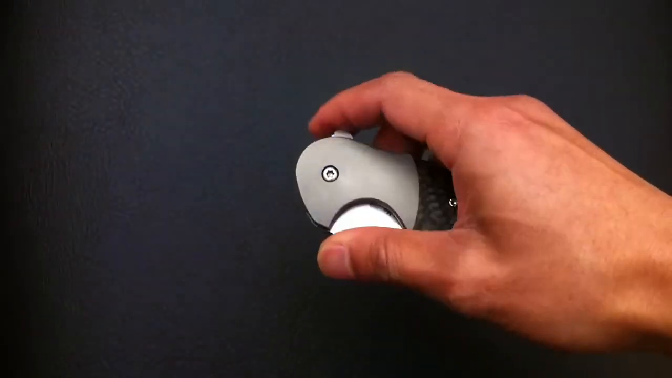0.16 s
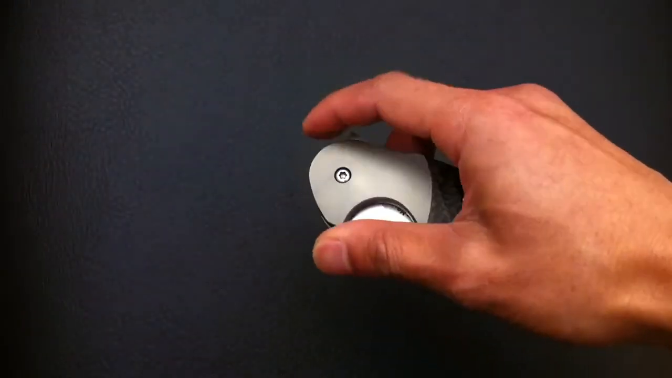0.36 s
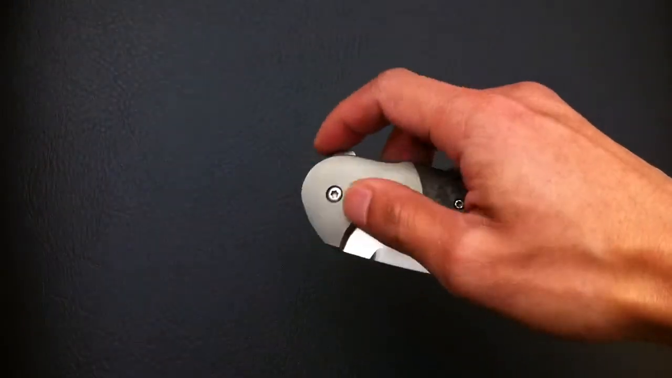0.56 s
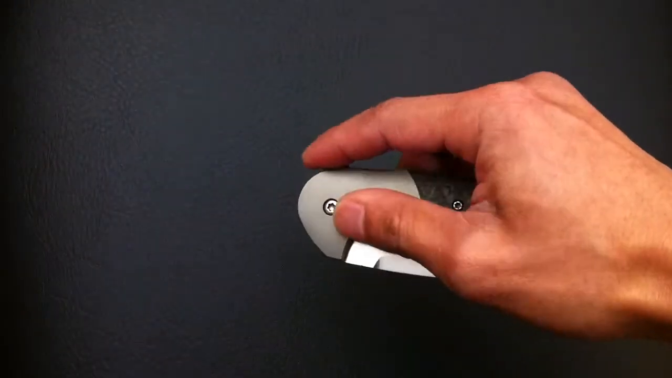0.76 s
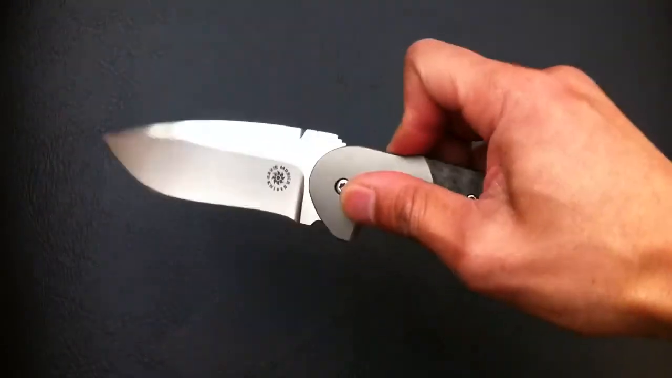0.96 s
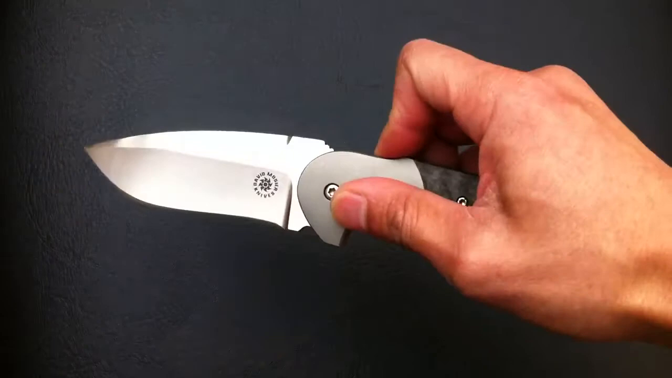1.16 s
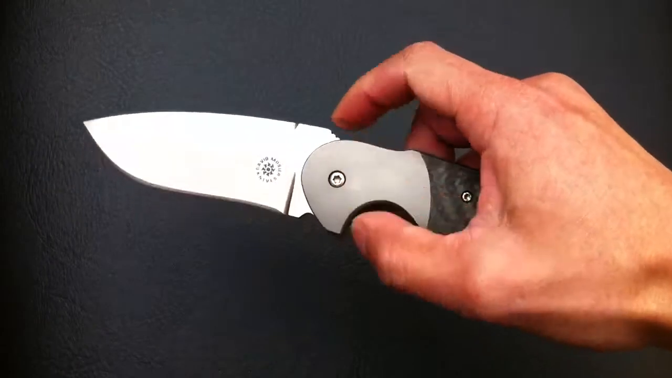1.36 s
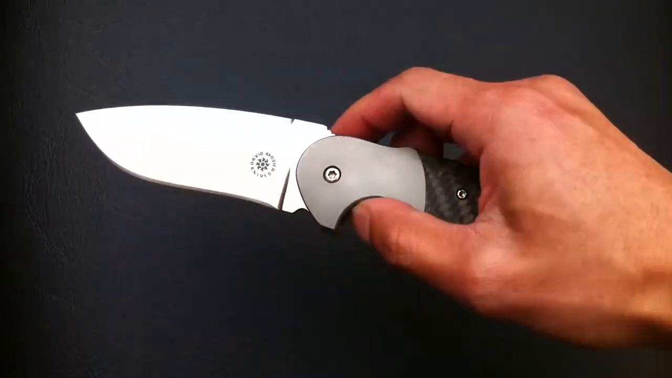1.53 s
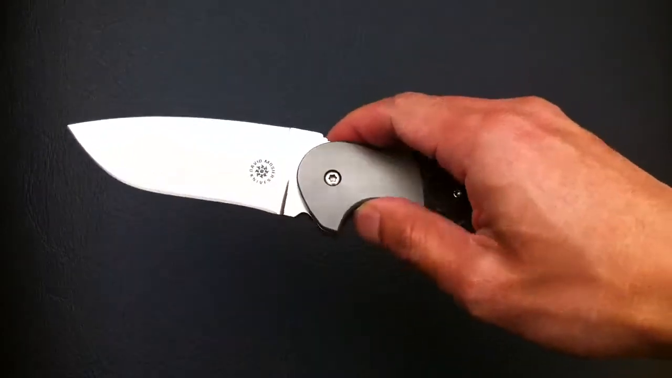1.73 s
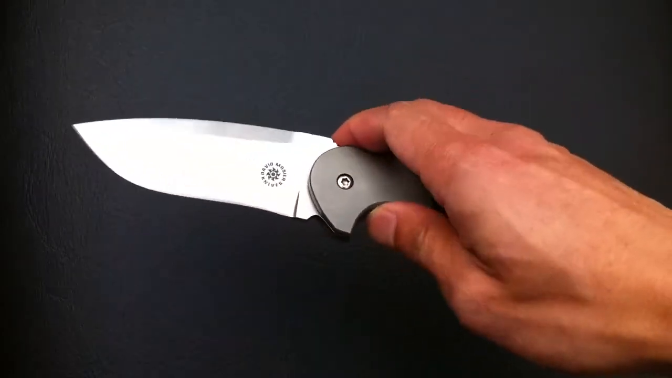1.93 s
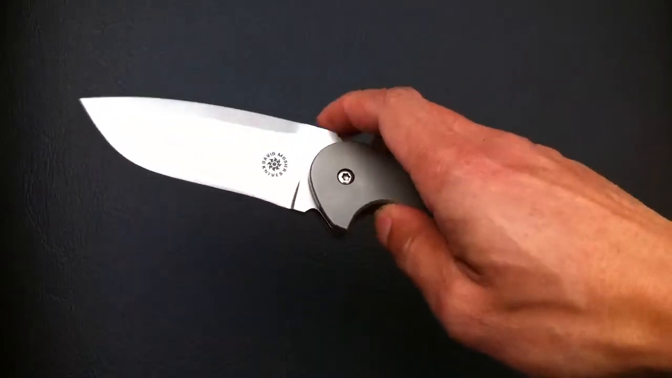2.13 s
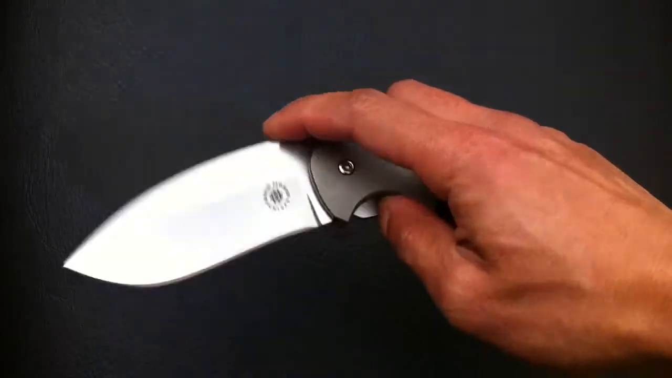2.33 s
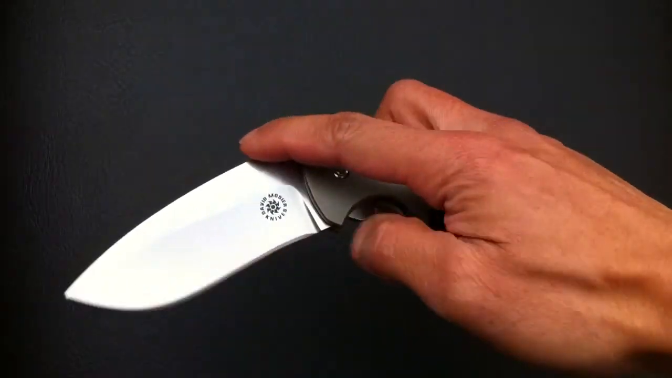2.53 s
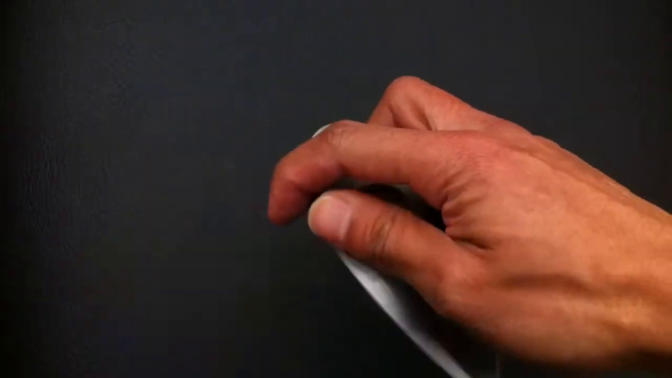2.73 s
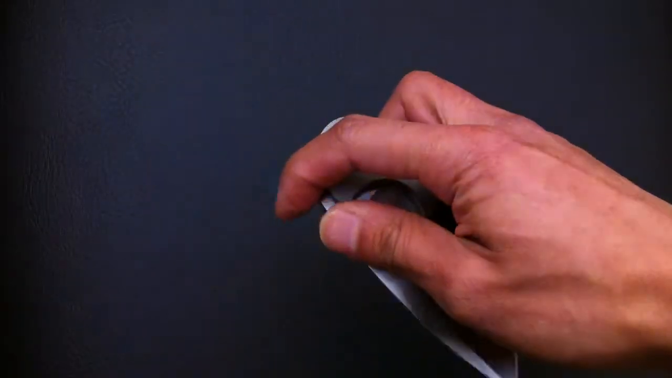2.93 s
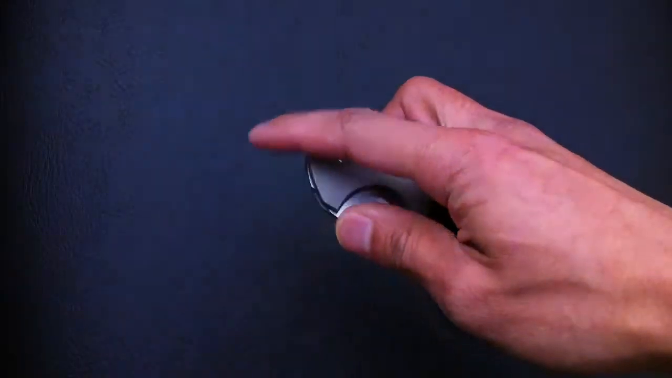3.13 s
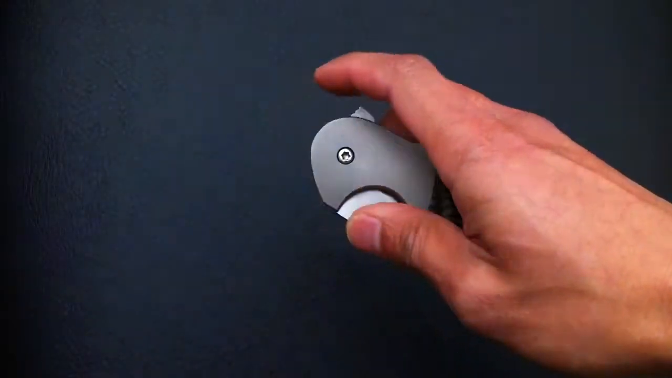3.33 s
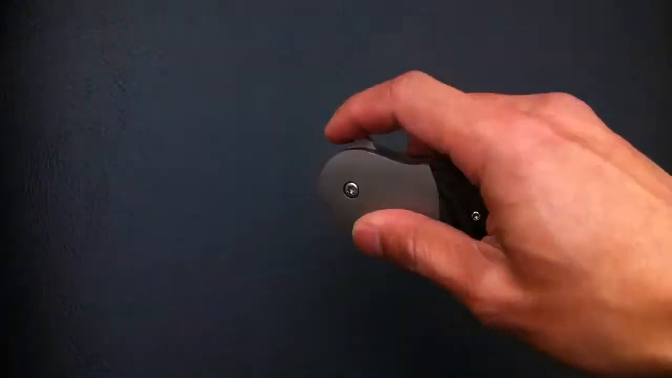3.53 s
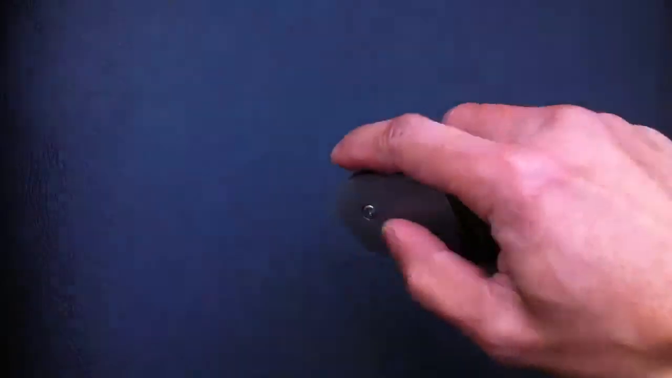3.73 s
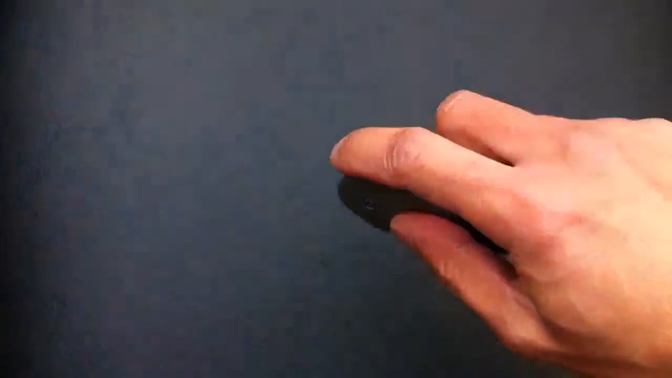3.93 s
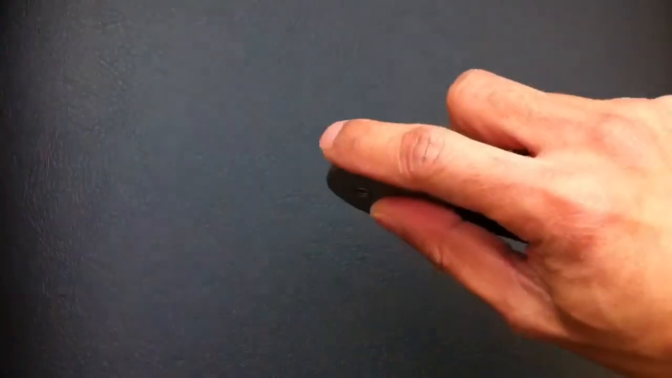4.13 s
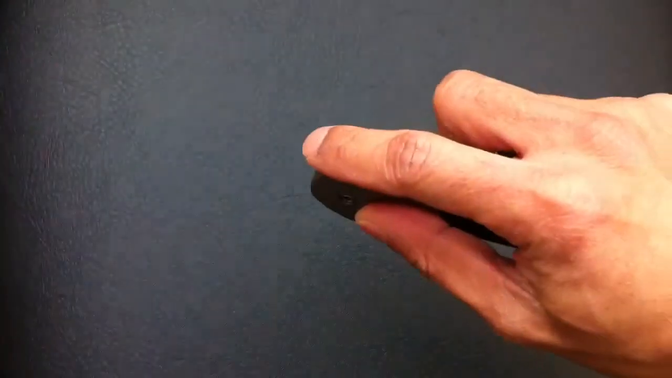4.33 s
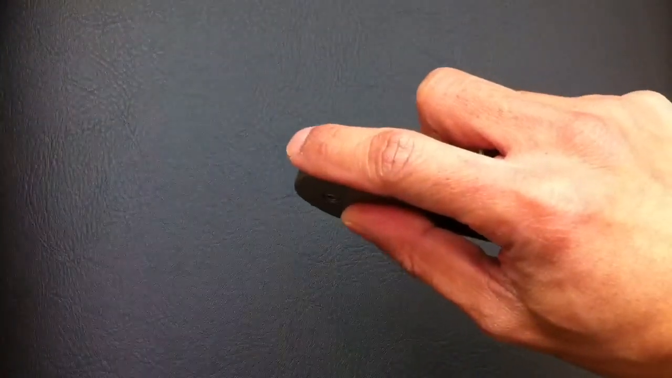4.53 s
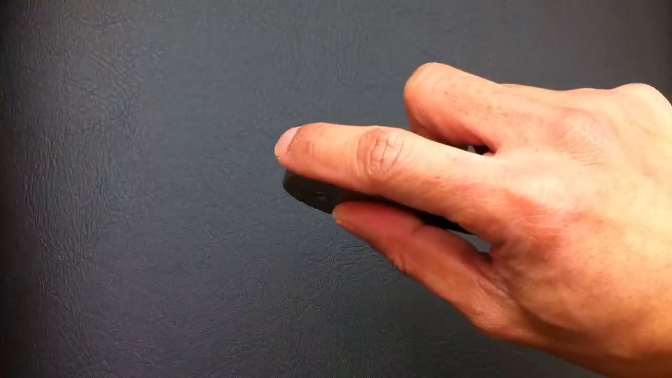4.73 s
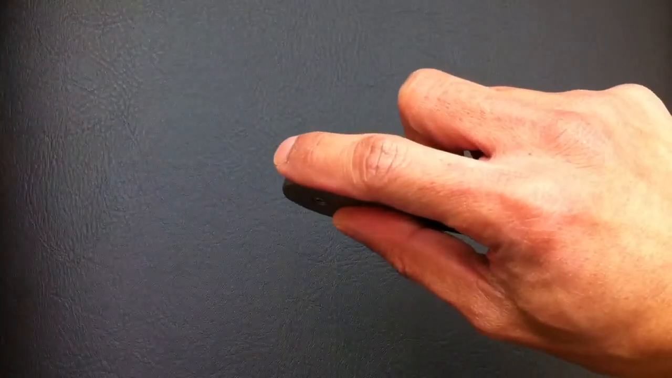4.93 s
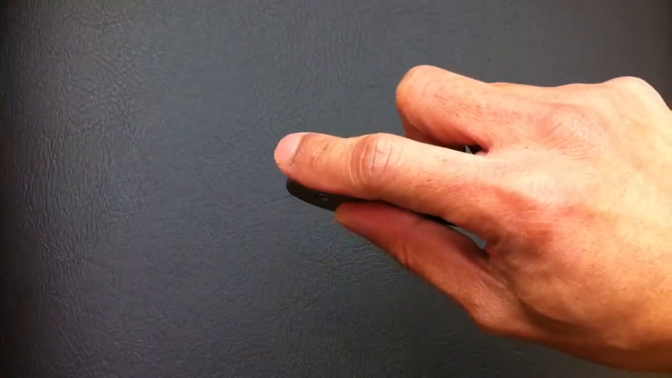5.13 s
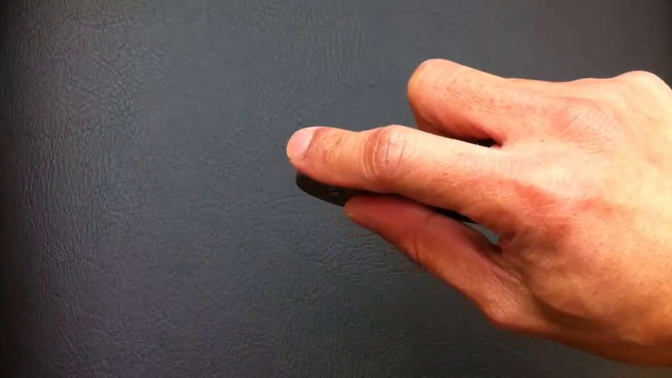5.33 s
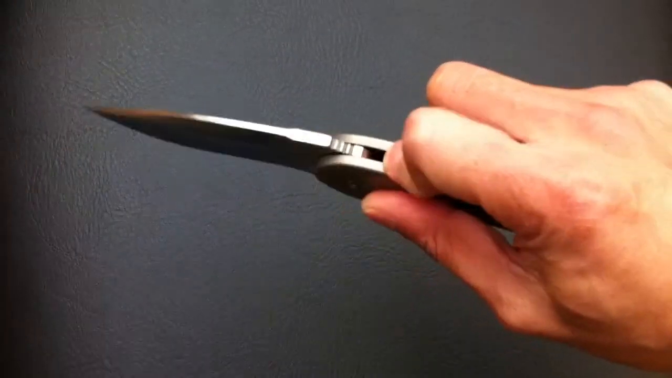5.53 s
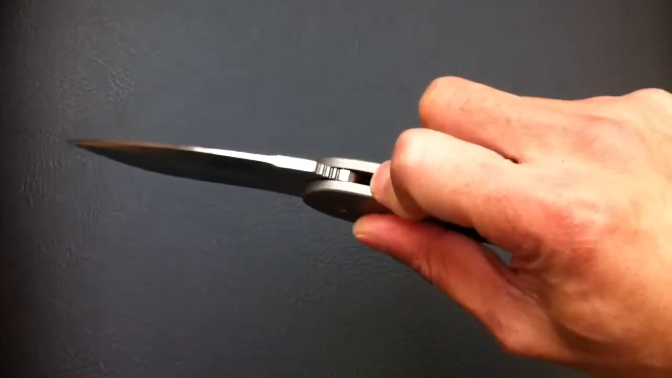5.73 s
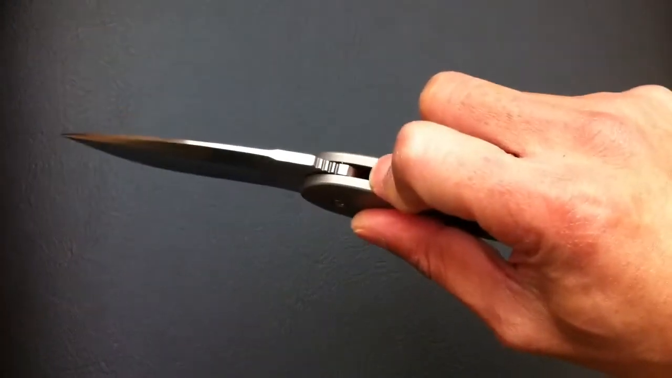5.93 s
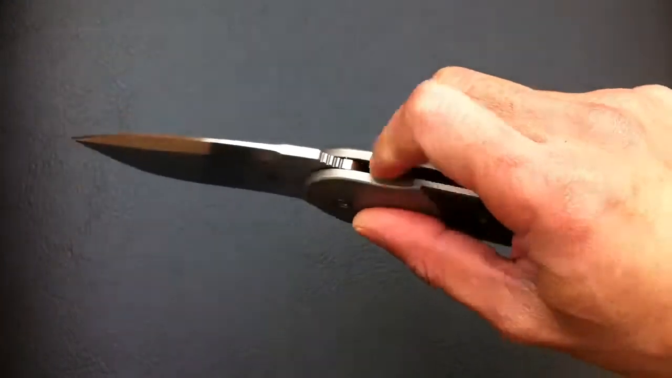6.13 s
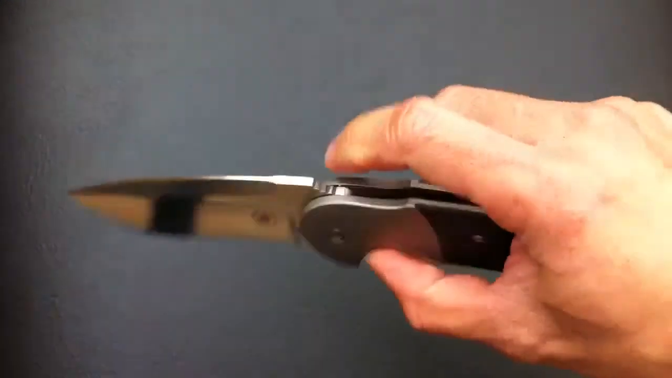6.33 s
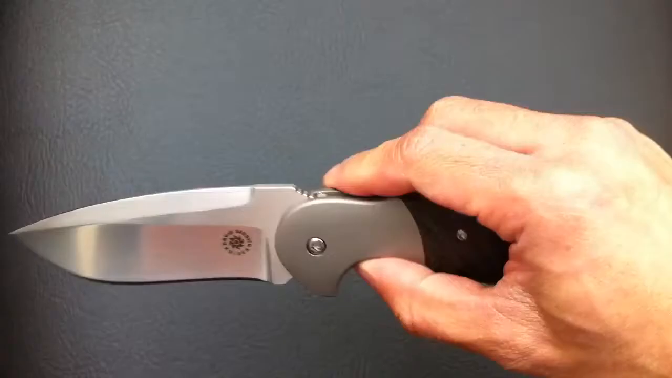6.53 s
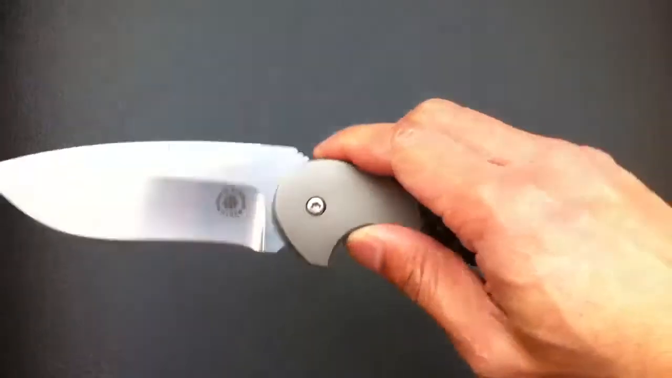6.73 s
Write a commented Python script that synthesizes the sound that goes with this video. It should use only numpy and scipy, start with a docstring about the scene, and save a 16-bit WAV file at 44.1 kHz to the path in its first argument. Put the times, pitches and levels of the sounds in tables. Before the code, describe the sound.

A folding knife is flicked open twice with sharp metallic snaps, with small clicks and soft handling between, over a faint fan.

```python
"""Folding knife, flicked open twice

Close up in a small room with a fan, a knife is flicked open, folded shut and flicked open again.
The blade whirrs on its pivot, the lock bar clicks and the blade slams on its stop; fingers bump and
rub the handle. Each slam drives a limiter down, so the room noise sinks and swells back."""
import sys
import numpy as np
from scipy import signal
from scipy.fft import rfft, irfft, next_fast_len
from scipy.io import wavfile
from scipy.ndimage import uniform_filter1d

SR = 44100
rng = np.random.default_rng(int(sys.argv[2]) if len(sys.argv) > 2 else 0)


def int16_out(signal):
    """Quantize to a 16-bit WAV file."""
    q = np.round(np.clip(np.atleast_2d(signal).T, -1, 1) * 32767)
    wavfile.write(sys.argv[1], SR, q.astype(np.int16))


N = 299439
TIME = np.arange(N) / SR

# The bright crack of a contact. Each row: frequency in Hz, level in dB.
CRACK_COLOUR = [(1200, -15.5), (2200, -2), (3700, -5), (5000, 0), (6500, 3.5), (10000, -2), (13500, -8.5),
                (16000, -21)]


def snaps(crack_db, crack_s, blade_db, detune, ring_share=1, pitch_ratio=1, hand_cover_db=0):
    """Slams and clicks: heavy blows crack harder; the blade sings on, less when covered or shut."""
    # The free blade's faint ring. Each row: pitch in Hz, level in dB, t60 in seconds.
    blade_modes = [(5040, -44, .18), (6140, -39, .17), (5949, -38.5, 0.25), (5740, -42, .18),
                   (6590, -49.5, .17)]
    hardening, covered_blade_db = 0.12, -10
    out, t = np.zeros(N), np.arange(SR // 3) / SR
    for s, db, modes, ratio, colour, cover in slams() + bar_clicks():
        tuned = retuned(modes, ratio * pitch_ratio, ring_share)
        hit = strike(tuned, colour, crack_db + hardening * db, crack_s, detune)
        add(out, s, from_db(db + cover * hand_cover_db) * hit)
        blade = ring(blade_modes, t, spread_db=3, detune=0.001008)
        add(out, s, from_db(db + blade_db + cover * covered_blade_db) * blade)
    return out


def slams(flats_mid_db=-1, flats_cover=0.75):
    """List the blade's hits and rebounds on its stop; the grip decides which modes ring."""
    # Each row: start in seconds, level in dB, grip from 0 (by the flats) to 1 (by the edges),
    # midrange boost in dB, pitch ratio.
    blows = [(1.0719, 4.5, 0.17, 0, 1.06), (1.0732, 5.5, .05, -4.5, .995), (1.0759, -7.5, .05, -4, 1.03),
             (5.6592, 2, 0.88, 0.5, 1.005), (5.6604, 2, 0.81, 2.5, .995), (5.6618, -2, 0.66, 1.5, 1.03)]
    # Blade and handle, damped by the hand. Each row: pitch in Hz, level in dB held by the flats,
    # level in dB held by the edges, t60 in seconds.
    knife_modes = [(1440, -27, -23.5, 0.0089), (1957, -17, -11, .006), (2480, -16, -9.5, 0.0098),
                   (3230, -21.5, -5, 0.012), (4690, -23.5, -10.5, 0.0088), (5220, -17, -2, .011),
                   (6200, 0, -0.5, 0.012), (6453, 0, -4, 0.011), (7062, -6, -2, 0.01),
                   (7740, -11, -11.5, .009), (9100, -9.5, -13, .006), (10950, -18, -8.5, 0.0069),
                   (12300, -12, -12, 0.0036), (13886, -25.5, -13, 0.0041)]
    hits = []
    for s, db, edges, mid_db, ratio in blows:
        modes = [(hz, np.interp(edges, [0, 1], [flats_db, edges_db]), t60)
                 for hz, flats_db, edges_db, t60 in knife_modes]
        colour = boosted(CRACK_COLOUR, mid_db + flats_mid_db * (1 - edges))
        cover = flats_cover * (1 - edges)
        hits.append((s, db, boosted(modes, mid_db), ratio, colour, cover))
    return hits


def bar_clicks():
    """List the lock bar's clicks and bounces as the blade leaves the detent, locks or is pulled shut."""
    # Each row: start in seconds, level in dB, midrange boost in dB, boost of the bar's low ring in dB,
    # pitch ratio, whether the blade is shut.
    clicks = [(0.051, -32.5, 9, 3, 1.03, True), (0.0548, -21, 2, 2, 0.99, True),
              (1.0029, -42, 0, 13, 1.1, True), (1.0053, -36, -3, 16.5, 1.04, True),
              (1.0639, -13.5, -12.5, 3, 1.001, False), (1.0655, -14, -10.5, -2.5, 1.001, False),
              (3.3153, -35, -1, 0, 1.2, True), (3.3182, -22.5, 1.5, -0.5, 1.022, True),
              (5.5974, -38.5, 2, 14, 1.05, True), (5.6516, -19, -10, 6, 1.04, False),
              (5.6536, -18, -10, 14.5, 0.94, False)]
    # The lock bar with its detent ball. Each row: pitch in Hz, level in dB, t60 in seconds.
    bar_modes = [(2568, -14, .005), (3230, -16.5, .007), (5025, -9.5, 0.011), (6050, -2, 0.006),
                 (6737, -0.5, .01), (7450, -5.5, 0.0058), (9100, -10, 0.0045), (11400, -19, 0.0042),
                 (13400, -24.5, .005)]
    hits = []
    for s, db, mid_db, low_ring_db, ratio, shut in clicks:
        modes = boosted(boosted(bar_modes, mid_db), low_ring_db, centre_hz=5200, octaves=0.13)
        hits.append((s, db, modes, ratio, boosted(CRACK_COLOUR, mid_db), shut))
    return hits


def ticks():
    """Tiny, dry stick-slip ticks as a finger loads the flipper or catches on the handle."""
    # Each row: start in seconds, level in dB, midrange boost in dB, pitch ratio.
    slips = [(0.376, -45.5, -13, 0.83), (2.4903, -51, 0, .82), (3.985, -50, -3, 1.1),
             (4.4067, -36, 1, 1.03), (4.5252, -47.5, -3, 1.04), (4.863, -42, 17, 0.9),
             (4.8679, -32, 0, 1.03), (4.8959, -34.5, -5, 0.99), (4.9332, -34, -4, 1), (4.9625, -35.5, 0, 1),
             (4.9966, -39, -4, 1.015), (5.0241, -43, -5, .99)]
    # The knife's stiff, high modes. Each row: pitch in Hz, level in dB, t60 in seconds.
    tick_modes = [(3360, -5.5, 0.0047), (5500, -5, .005), (6820, 6.5, 0.0036), (7470, 2.5, 0.013),
                  (7960, -0.5, 0.0041), (9380, -4.5, 0.013), (10800, -5.5, 0.0076), (13700, -16, .003)]
    out = np.zeros(N)
    for s, db, mid_db, ratio in slips:
        modes = retuned(boosted(tick_modes, mid_db), ratio)
        tick = strike(modes, boosted(CRACK_COLOUR, mid_db), crack_db=-7.5, crack_s=0.0009, detune=0.018)
        add(out, s, from_db(db) * tick)
    return out


def slides(grain_db=2, resonance_db=-3, width_hz=1100):
    """Grainy friction swells and fades with each stroke, ringing the rubbed part and the handle."""
    # Skin sliding on metal. Each row: midpoint in seconds, half-length in seconds, level in dB,
    # resonance in Hz, handle ring in dB.
    skin_strokes = [(0.152, 0.086, -63, 10000, -28), (0.382, 0.031, -56.5, 5550, 3),
                    (0.411, 0.081, -62.5, 5700, 0.5), (0.802, 0.24, -70, 6300, -12),
                    (1.421, 0.143, -66.5, 6400, -10), (1.631, 0.15, -67.5, 6400, -8),
                    (1.923, 0.33, -71.5, 6160, -9), (2.474, 0.025, -59, 5140, -15),
                    (2.604, .053, -63, 5970, -13), (2.831, .14, -71, 7000, -13.5),
                    (3.563, 0.1, -59.5, 5830, -1), (3.672, 0.13, -61, 5770, -7.5),
                    (3.878, .1, -66, 5860, -5.5), (3.984, 0.047, -63, 8760, -15),
                    (4.094, 0.079, -64.5, 6800, -12.5), (4.44, 0.065, -61.5, 8030, -18.5),
                    (5.398, 0.14, -64.5, 4670, -11), (6.435, 0.064, -63, 6460, -11),
                    (6.672, 0.25, -67.5, 6600, -10)]
    # The pivot whirring as the blade swings open. Rows as for the skin.
    pivot_swings = [(1.021, .038, -53.5, 6248, -11.5), (5.615, .038, -53, 6400, -14)]
    # The hiss of friction. Each row: frequency in Hz, level in dB.
    rub_colour = [(1500, -18), (2600, -1.5), (3700, -8.5), (4800, -5), (6000, 0), (7400, -2.5), (8400, -4),
                  (11000, -4.5), (13000, -10), (16000, -16.5)]
    # The rubbed handle's resonances. Each row: pitch in Hz, width in Hz, level in dB.
    handle_rings = [(2620, 110, -4), (5600, 200, 1.5), (6100, 220, -3), (8250, 400, -8.5),
                    (10953, 400, -5.5)]
    out = np.zeros(N)
    for s, half_s, db, hz, ring_db in skin_strokes + pivot_swings:
        size = int(2 * half_s * SR)
        stroke = np.hanning(size) ** 2
        surface = rms_one(uniform_filter1d(rng.standard_normal(size), size=90))
        rub = rms_one(from_db(grain_db * surface) * scratch(size) * noise(rub_colour, size))
        part = from_db(resonance_db) * resonate(rub, hz, width_hz)
        rings = sum(from_db(level) * resonate(rub, pitch, width) for pitch, width, level in handle_rings)
        handle = from_db(ring_db) * rms_one(rings)
        add(out, s - half_s, from_db(db) * stroke * rms_one(rub + part + handle))
    return out


def scratch(size, catches_per_s=260, catch_s=0.0003, catch_db=5):
    """Gain of a rub: the skin catches at random, and each slip is a brief spurt."""
    catches = (rng.random(size) < catches_per_s / SR) * rng.random(size)
    return 1 + from_db(catch_db) * signal.lfilter([1], [1, -np.exp(-1 / (catch_s * SR))], catches)


def thuds(swell_s=0.00456, reference_db=-34.5, shortening=0.354):
    """The handle meets flesh in thuds of a few cycles; a harder bump is shorter."""
    # Soft bumps on the fingers. Each row: crest in seconds, level in dB, pitch in Hz.
    bumps = [(0.015, -43.5, 223), (.667, -35.5, 151), (0.697, -32, 256), (1.357, -37, 158),
             (1.785, -36.5, 166.2), (3.332, -32, 274), (3.355, -22.5, 191), (3.357, -36, 367),
             (3.504, -26.5, 168), (3.507, -41.5, 337), (3.524, -34.5, 230), (3.581, -35, 182),
             (3.674, -40, 128), (3.751, -37.5, 192), (3.831, -34, 145)]
    # Hard knocks in the hand. Each row: crest in seconds, level in dB, pitch in Hz, swell in seconds.
    knocks = [(1.0733, -19, 970, 0.00076), (1.0734, -33.5, 350.7, .0016), (4.863, -45, 1600, .0005),
              (5.599, -40.5, 2150, 0.00051), (5.6602, -24, 1660, .0005), (5.6607, -32, 700, 0.00083)]
    soft = [(s, db, hz, swell_s * from_db(shortening * (reference_db - db))) for s, db, hz in bumps]
    out, t = np.zeros(N), np.arange(SR // 6) / SR
    for s, db, hz, swell in soft + knocks:
        push = (t / (2 * swell)) ** 4 * np.exp(4 - 2 * t / swell)   # crests at twice the swell time
        add(out, s - 2 * swell, from_db(db) * push * np.sin(2 * np.pi * (hz * t + rng.random())))
    return out


def grip(rise_db_per_s=330, rest_db=-69):
    """The hand rumbles: each shift of grip rises fast and settles back to the resting hold."""
    # Each row: crest in seconds, level in dB, settling rate in dB per second.
    regrips = [(.68, -41, 100), (1.3, -48, 89.5), (3.335, -41.5, 128.5), (3.51, -48.5, 17),
               (3.799, -48, 40)]
    # The hand's low rumble. Each row: frequency in Hz, level in dB.
    grip_colour = [(30, -20.5), (60, -13), (100, 1.5), (170, 4.5), (260, -5.5), (400, -7), (700, -32.5),
                   (1500, -62)]
    shifts_db = [db - np.maximum(rise_db_per_s * (s - TIME), settling * (TIME - s))
                 for s, db, settling in regrips]
    return from_db(np.maximum(np.max(shifts_db, axis=0), rest_db)) * noise(grip_colour)


def palm(spread_octaves=0.21, half_s=0.05):
    """The palm drags dully over the handle, twice."""
    out = np.zeros(N)
    stroke = np.hanning(int(2 * half_s * SR)) ** 2
    for s, db, hz in [(1.92, -48, 566), (1.99, -52, 440)]:
        rub = noise_band(hz / 2 ** spread_octaves, hz * 2 ** spread_octaves, len(stroke))
        add(out, s - half_s, from_db(db) * stroke * rub)
    return out


def fan(air_db=-52.5):
    """A bed of dull, steady air noise with two wavering drones."""
    # Moving air in the room. Each row: frequency in Hz, level in dB.
    air_colour = [(25, -14.5), (55, -20), (85, -16.5), (125, -0.5), (220, 2), (400, -2.5), (650, -5.5),
                  (920, -2.5), (1400, -9.5), (2000, -18.5), (3000, -27.5), (6500, -28.5), (9500, -32.5),
                  (15500, -35)]
    # Each row: pitch in Hz, width in Hz, level in dB.
    drones = [(144.8, 7.6, -64), (270.4, 16, -59.5)]
    out = from_db(air_db) * noise(air_colour)
    for hz, width, db in drones:
        out += from_db(db) * noise_band(hz - width / 2, hz + width / 2)
    return out


def room(x, first_echo_s=0.0026, early_t60_s=0.06, early_db=-13, tail_t60_s=0.22, tail_db=-17):
    """Quick reflections from the table and the hand, then the walls' dense, duller tail."""
    # The tone of the reflections. Each row: frequency in Hz, level in dB.
    room_colour = [(100, -13.5), (800, -4), (2400, -2.5), (3300, 0.5), (4200, 0), (5900, 3), (6800, -3.5),
                   (7800, -2), (10000, 2), (16000, -8.5)]
    t = np.arange(SR // 2) / SR
    early, tail = (noise(room_colour, len(t)) * from_db(-60 * t / t60) * (t > first_echo_s)
                   for t60 in (early_t60_s, tail_t60_s))
    tail = filtered(tail, "low", hz=11000)
    response = from_db(early_db) * early / np.linalg.norm(early)
    response += from_db(tail_db) * tail / np.linalg.norm(tail)
    return signal.fftconvolve(x, response)[:N]


def strike(modes, crack_colour, crack_db, crack_s, detune):
    """One contact with peak 1: modes ring under a brief crack; so small a body radiates no bass."""
    t = np.arange(SR // 16) / SR
    body = ring(modes, t, spread_db=-0.5, detune=detune)
    crack = from_db(crack_db) * noise(crack_colour, len(t)) * np.exp(-t / crack_s)
    hit = filtered(body + crack, "high", hz=600)
    return hit / np.abs(hit).max()


def ring(modes, t, spread_db, detune):
    """Modes decay from one blow; the spot struck and the grip vary their strength and pitch a little."""
    hz, db, t60 = np.transpose(modes)[:, :, None]
    strength, shift = rng.standard_normal((2, len(modes), 1))
    sign = (-1) ** np.arange(len(modes))[:, None]
    decay = from_db(db + spread_db * strength - 60 * t / t60)
    return np.sum(sign * decay * np.sin(2 * np.pi * hz * (1 + detune * shift) * t), axis=0)


def boosted(rows, boost_db, centre_hz=2900, octaves=0.27):
    """A bell EQ on rows that begin with Hz and dB, by default at the handle's midrange."""
    return [(hz, db + boost_db * np.exp(-(np.log2(hz / centre_hz) / octaves) ** 2 / 2), *rest)
            for hz, db, *rest in rows]


def retuned(modes, ratio, ring_share=1):
    """Modes shifted in pitch by the spot struck, ringing for a share of their usual time."""
    return [(hz * ratio, db, t60 * ring_share) for hz, db, t60 in modes]


def resonate(x, hz, width_hz):
    """One resonance, at unit power."""
    return rms_one(signal.lfilter(*signal.iirpeak(hz, hz / width_hz, fs=SR), x))


def noise(colour, size=N):
    """Unit-power noise shaped by points of Hz and dB."""
    padded = next_fast_len(size)
    hz, db = np.transpose(colour)
    gain = from_db(np.interp(np.log(np.fft.rfftfreq(padded, 1 / SR) + 1), np.log(hz), db))
    return rms_one(irfft(rfft(rng.standard_normal(padded)) * gain, padded)[:size])


def noise_band(low_hz, high_hz, size=N):
    """A band of noise at unit power."""
    return rms_one(filtered(rng.standard_normal(size), "band", [low_hz, high_hz]))


def filtered(x, kind, hz):
    """A gentle low-, high- or band-pass."""
    return signal.sosfilt(signal.butter(2, hz, kind, fs=SR, output="sos"), x)


def from_db(db):
    """Decibels to gain."""
    return 10 ** (np.asarray(db) / 20)


def rms_one(x):
    """Scale to unit power."""
    return x / np.sqrt(np.mean(x ** 2) + 1e-20)


def add(track, s, sound):
    """Mix a sound into the track from time s."""
    start = max(0, round(s * SR))
    track[start:start + len(sound)] += sound[:max(0, N - start)]


def scene(sides=3):
    """The close knife, its reflections, the hand and the fan, in mono."""
    friction = ticks() + slides()
    direct = snaps(crack_db=-10.5, crack_s=0.0011, blade_db=-19.5, detune=0.0034) + friction
    reflections = np.zeros(N)
    for _ in range(sides):   # the walls hear the knife from all sides, so its peaks and notches even out
        off_axis = snaps(crack_db=-0.5, crack_s=0.00049, blade_db=-17.5, detune=0.025,
                         ring_share=0.55, pitch_ratio=0.97, hand_cover_db=-6)
        reflections += room(off_axis + from_db(-10) * friction) / np.sqrt(sides)
    return (direct + reflections + thuds() + grip() + palm() + fan())[None]


def record(dry, threshold_db=-10.5, release_s=0.85, clip_level=0.88, low_cut_hz=68, high_cut_hz=16000):
    """A limiter ducks at once and lets go slowly; overshoots are rounded; rumble and the top are cut."""
    power = uniform_filter1d(dry[0] ** 2, size=110)
    over_db = np.maximum(10 * np.log10(np.abs(power) + 1e-12) - threshold_db, 0)
    release = np.exp(-TIME / release_s)
    duck_db = np.maximum.accumulate(over_db / release) * release
    rounded = clip_level * np.tanh(dry * from_db(-duck_db) / clip_level)
    lean = filtered(rounded, "high", low_cut_hz)
    return signal.sosfilt(signal.ellip(10, 0.1, 80, high_cut_hz, fs=SR, output="sos"), lean)


dry = scene()
out = record(dry)
int16_out(out)
```